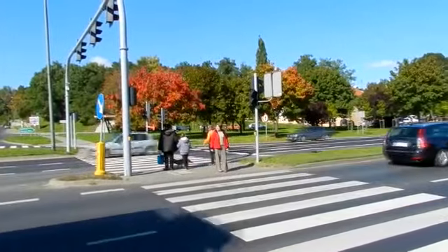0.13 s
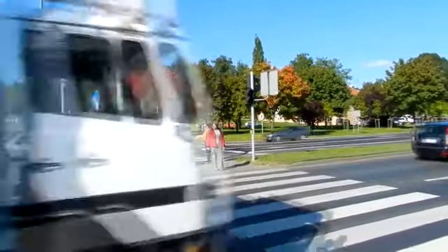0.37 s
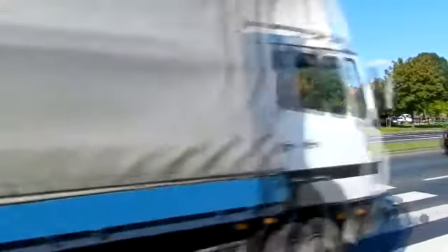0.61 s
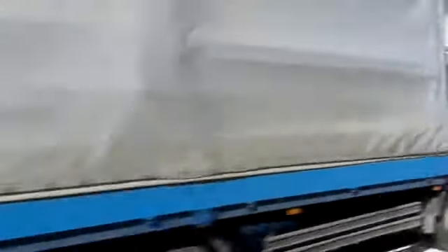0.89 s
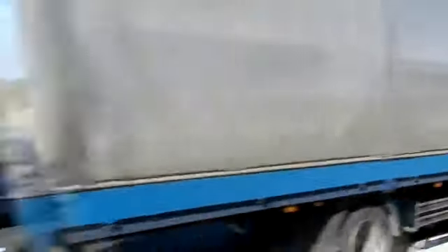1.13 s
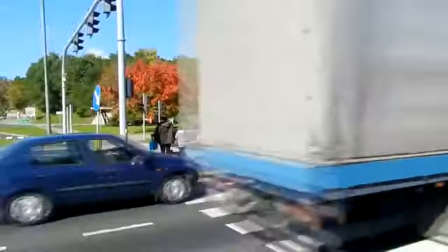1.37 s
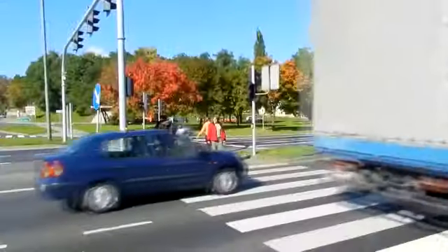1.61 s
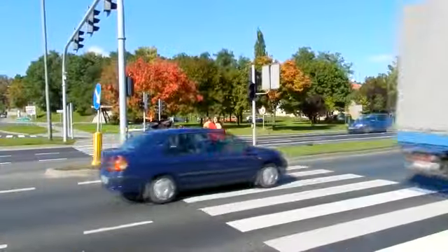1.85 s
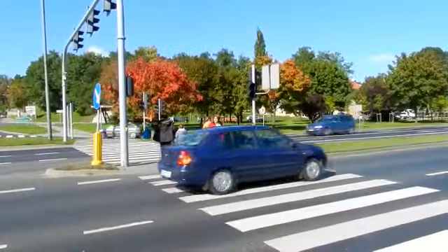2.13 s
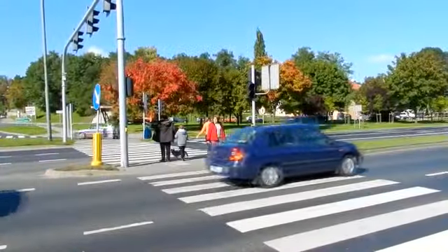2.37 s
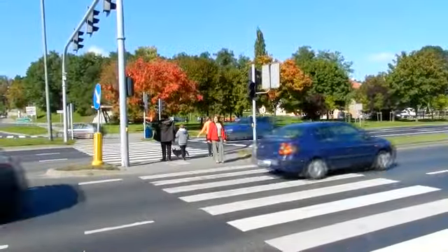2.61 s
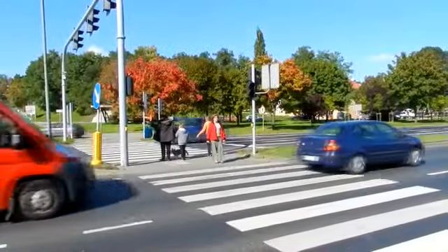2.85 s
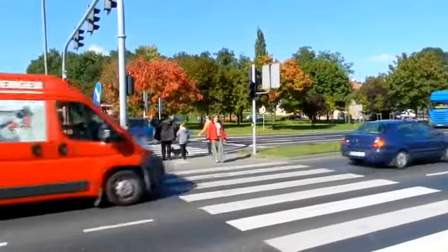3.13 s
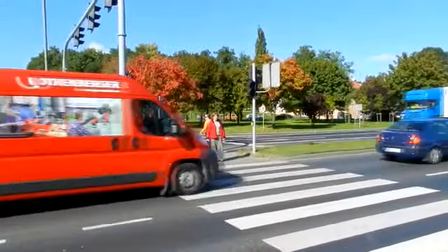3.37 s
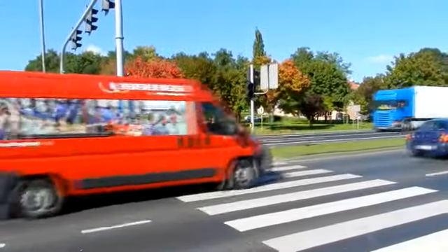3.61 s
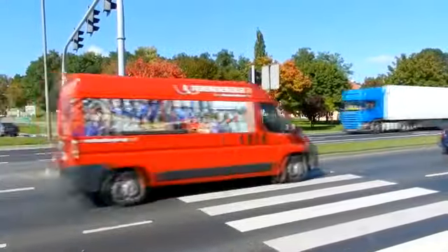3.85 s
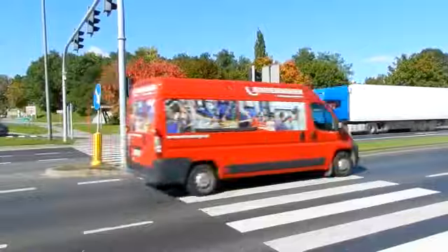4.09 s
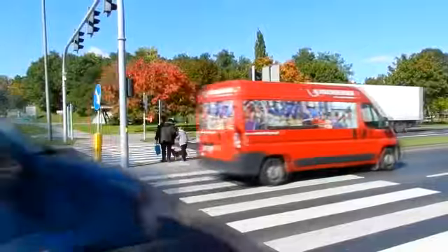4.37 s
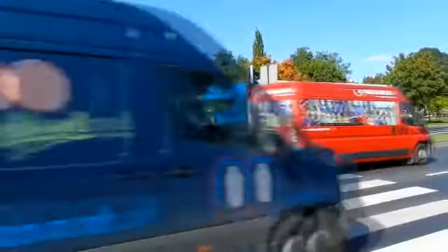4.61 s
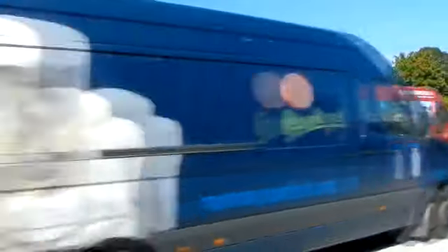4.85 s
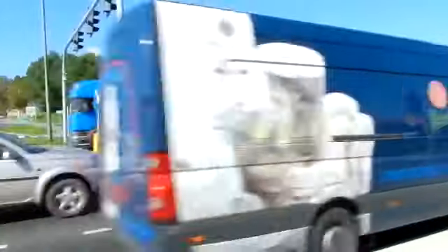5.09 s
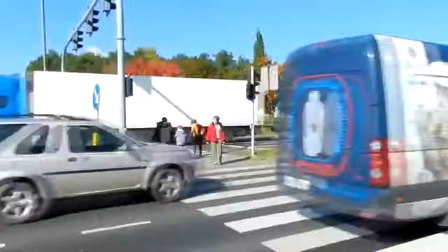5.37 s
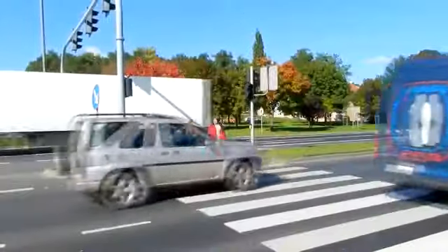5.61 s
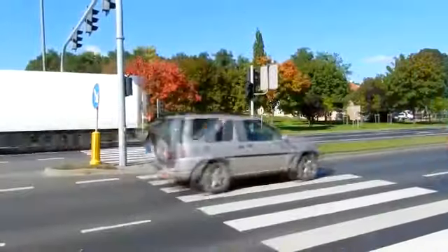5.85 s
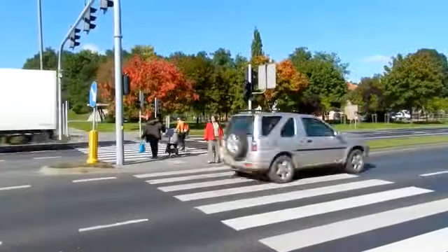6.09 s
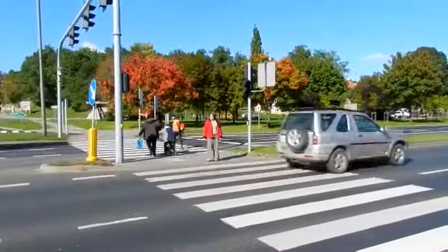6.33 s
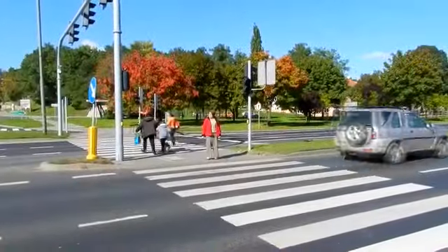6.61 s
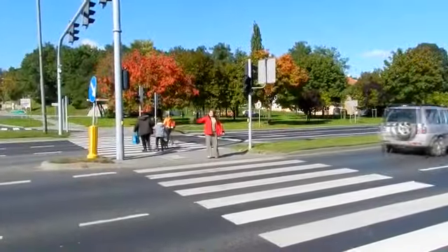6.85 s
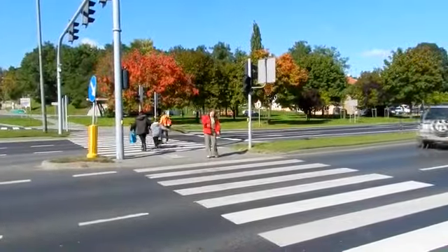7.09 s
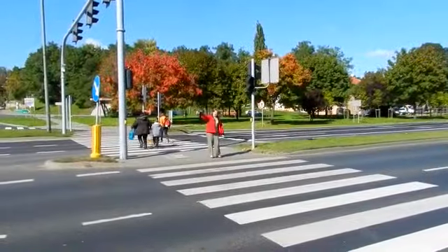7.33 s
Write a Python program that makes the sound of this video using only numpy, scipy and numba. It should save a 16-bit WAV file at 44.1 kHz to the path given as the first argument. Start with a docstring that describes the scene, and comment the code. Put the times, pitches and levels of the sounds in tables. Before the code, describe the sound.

Outdoor kerbside traffic in stereo, close and dry, with faint distant road rumble. From 0 s a diesel truck drones, its buzzing firing tone near 85 Hz; tyre roar, brighter hiss and a brief tread hum peak around 0.4-0.5 s, with a small squeaky hiss near 0.8 s. The truck moves away, its growl rising smoothly to about 107 Hz by 3.4 s, then falling quickly and gone by 4.1 s. A car's tyres swell at 2.75 s; one tiny sharp pebble tick at 2.9 s. Vans rush past from 3.5 to 5 s, loudest near 4 s, with low wavering hums and a very faint, breathy turbo whistle rising. Another car hums upward around 5.5 s. From about 4 s wind gusts thud and flutter heavily at the microphone, roughest at 5.2-6 s, continuing irregularly. A last low engine hum and tyre roar approach from 6.7 s to the end at 7.5 s.

```python
"""Street traffic in rising wind

A six-cylinder truck pulls past and away, then vans and cars follow, heard from the kerb in stereo.
Engines are sums of gliding tones; tyre roar, engine-bay hiss and turbocharger whistle are filtered noise.
A pebble ticks once, gusts flutter at two microphone ports, and the level of everything dips briefly."""
import sys
import numpy as np
from scipy import signal
from scipy.io import wavfile
from scipy.ndimage import uniform_filter1d
from numba import njit

SR = 44100
rng = np.random.default_rng(int(sys.argv[2]) if len(sys.argv) > 2 else 0)


def voltage_ratio(level):
    """Linear amplitude factor for a level in decibels (scalar or array-like)."""
    return 10 ** (np.asarray(level, float) / 20)


def store_wav(level_fs):
    """Save 16-bit WAV to argv[1]."""
    pcm = np.round(np.clip(np.atleast_2d(level_fs), -1, 1) * 32767)
    wavfile.write(sys.argv[1], SR, pcm.T.astype(np.int16))


N = 329427
LEFT_RIGHT = np.array([[1], [-1]])


def rms_one(x):
    """Scales to rms 1."""
    return x / np.sqrt(np.mean(x ** 2, axis=-1, keepdims=True) + 1e-20)


def in_time(rows):
    """Interpolates each column over time; the first column is seconds."""
    s, *columns = np.transpose(rows)
    return [np.interp(np.arange(N) / SR, s, c) for c in columns]


def at_hz(points, hz):
    """Interpolates a curve of (Hz, value) over log frequency."""
    curve_hz, values = np.transpose(points)
    return np.interp(np.log(hz), np.log(curve_hz), values)


def drift(rate_hz):
    """Slow chance of spread 1: noise at every 40th sample through a double one-pole low-pass."""
    r = np.exp(-80 * np.pi * rate_hz / SR)
    noise = rng.standard_normal(N // 40 + 2002)
    slow = signal.lfilter([1], [1, -2 * r, r * r], noise)[2000:]
    return np.interp(np.arange(N) / 40, np.arange(len(slow)), rms_one(slow))


@njit
def resonate(x, r, c):
    """Two-pole resonance with a moving centre, scaled so that white noise keeps its power."""
    y = np.zeros(len(x))
    for i in range(2, len(x)):
        drive = np.sqrt((1 - r[i] ** 2) / 2) * (x[i] - x[i - 2])
        y[i] = drive + 2 * r[i] * c[i] * y[i - 1] - r[i] ** 2 * y[i - 2]
    return y


def noise_band(hz, width_hz):
    """Noise twice through a moving resonance; level held near rms 1."""
    r = np.exp(-np.pi * width_hz / SR) * np.ones(N)
    c = np.cos(2 * np.pi * hz / SR) * np.ones(N)
    once = resonate(rng.standard_normal(N), r, c)
    return resonate(once, r, c) / np.sqrt((1 + r) / (1 - r) / 4)


def stereo(mid, side, alike):
    """Mixes two independent signals into channels with correlation alike."""
    return np.sqrt(1 + alike) * mid + np.sqrt(1 - alike) * side * LEFT_RIGHT


def spread(hz, width_hz, alike):
    """A stereo noise band, shared by both channels as far as alike says."""
    return stereo(noise_band(hz, width_hz), noise_band(hz, width_hz), alike) / np.sqrt(2)


def tone(turns, phase):
    """Sine of rms 1; turns and phase in cycles."""
    return np.sqrt(2) * np.sin(2 * np.pi * (turns + phase))


def swells(rows, floor_db, steep):
    """Rows (s, dB, time scale s, ..) swell like passing sources; powers add and weight the other columns."""
    s, db, scale_s, *columns = np.transpose(rows)[..., None]
    t = np.arange(0, N + 100, 100) / SR
    power = voltage_ratio(2 * db) / (1 + ((t - s) / np.maximum(scale_s, .01)) ** 2) ** steep
    total = power.sum(axis=0)
    coarse = [10 * np.log10(total)] + [(power * c).sum(axis=0) / total for c in columns]
    level_db, *others = [np.interp(np.arange(N) / SR, t, c) for c in coarse]
    return [10 * np.log10(voltage_ratio(2 * level_db) + voltage_ratio(2 * floor_db))] + others


def truck():
    """Firing tones as clean lines; unequal cylinders fill in every sixth of the firing rate."""
    # engine: (time [s], firing rate [Hz], relative level [dB], centre of the growl's lifted region [Hz])
    engine_rows = [(0, 84.9, 0.5, 450), (.35, 86.74, -1, 346), (.7, 88.95, -1, 440), (1.0, 90, -0.3, 620),
                   (1.3, 91.84, 0, 254), (1.8, 95.8, 1.1, 321.2), (2.3, 99.47, -1, 462.5),
                   (2.8, 103.2, -3.5, 336), (3.1, 106.1, -2.5, 295.7), (3.4, 107.3, -1.5, 252.7),
                   (3.55, 106.2, -4.5, 251.5), (3.93, 91.5, -2.5, 250), (4.1, 86.9, -18, 251.3)]
    # growl colour, one line per half turn order: (frequency [Hz], relative level [dB])
    growl_curve = [(20, -13), (55, -5), (150, -2), (250, -1.5), (400, -12), (800, -15.5), (1300, -20)]
    hz, engine_db, centre_hz = in_time(engine_rows)
    growl_db = engine_db - 30.0
    firing_db = firing_levels(hz, engine_db)
    firings = np.cumsum(hz * (1 + 0.00096 * drift(5.4))) / SR
    lines = np.zeros(N)
    for k in range(2, 72):      # half turn orders
        if k in (6, 12, 18, 24):
            level_db = firing_db[k // 6 - 1] + 0.92 * drift(9.2)
            phase = -.17        # the firing tones rise together, one steep pulse per firing
        else:
            line_hz = hz * k / 6
            octaves_off = np.log2(line_hz / centre_hz)
            lift_db = 6.5 * np.exp(-(octaves_off / 0.42) ** 2)
            level_db = growl_db + at_hz(growl_curve, line_hz) + lift_db + 3.7 * drift(1.5)
            if k % 2:
                level_db = level_db - 12.5      # half orders are weaker than whole turns
            if k % 6 == 0:
                level_db = level_db + 5.0       # higher multiples of the firing rate
            phase = rng.random()
        lines += voltage_ratio(level_db) * tone(firings * k / 6, phase)
    fade = np.clip((engine_rows[-1][0] - np.arange(N) / SR) / 0.093, 0, 1)
    echo = np.roll(lines, round(0.0031 * SR))      # a near reflection reaches the two ports unequally
    return fade * (lines + voltage_ratio(-31.5) * echo * LEFT_RIGHT + diesel_knock(firings, growl_db - 11.0))


def firing_levels(hz, engine_db):
    """Levels of four firing tones; the lowest grows as it climbs toward the exhaust pipe's resonance."""
    # firing tone and its 2nd, 3rd and 4th multiples: relative level [dB]
    tone_db = [-17, -14, -22.5, -33]
    # fades and swells, one list per tone: (time [s], change [dB], time scale [s])
    tone_changes = [
        [(0.47, -10, 0.12)],
        [(.7, 2.5, 0.15), (1.08, -4, 0.19), (2.48, 5, 0.066), (2.6, 5, 0.057), (3.21, -13.5, 0.081),
         (3.85, -15, 0.28)],
        [(.2, -29, 0.55), (1.35, 4, 0.085), (1.72, 4, 0.23), (2.57, -8, 0.091), (3.7, -12, 0.44)],
        [(.54, 16, 0.19), (2.0, 4.5, .6), (2.65, 2, .08), (3.6, -9, .5)],
    ]
    pipe_db_per_hz, pipe_from_hz = 0.5, 89.4
    t = np.arange(N) / SR
    levels = []
    for db, changes in zip(tone_db, tone_changes):
        change_db = sum(change * np.exp(-((t - s) / scale_s) ** 2) for s, change, scale_s in changes)
        levels.append(engine_db + db + change_db)
    levels[0] = levels[0] + pipe_db_per_hz * (hz - pipe_from_hz)
    return levels


def diesel_knock(firings, level_db):
    """Each combustion gates a short burst of block noise."""
    burst = rms_one(np.exp(-4.0 * (firings % 1)))
    block = spread(1400.0, 1070.0, 0.7) + voltage_ratio(-10.5) * spread(4700.0, 2400.0, 0.59)
    return voltage_ratio(level_db) * burst * block


def cars():
    """Van and car engines hum wavering, gliding notes, each with a weaker octave."""
    # notes: (start [s], end [s], start frequency [Hz], end frequency [Hz], mean level [dB rms])
    notes = [(3.6, 4.2, 143, 167, -26.5), (4.12, 5.15, 145, 98.5, -24), (4.004, 5.348, 54.4, 60.6, -24),
             (4, 5.303, 73, 68, -23.5), (5.247, 5.853, 113.9, 140.9, -21), (6.699, 7.297, 66, 73.8, -20.5)]
    fade_s, octave_db = 0.069, -15.0
    out, t = np.zeros(N), np.arange(N) / SR
    for start, end, start_hz, end_hz, level_db in notes:
        hz = np.interp(t, [start, end], [start_hz, end_hz])
        turns = np.cumsum(hz * (1 + 0.01105 * drift(5.0))) / SR
        heard = np.clip(np.minimum(t - start, end - t) / fade_s + .5, 0, 1)
        note = tone(turns, 0) + voltage_ratio(octave_db) * tone(2 * turns, rng.random())
        out += heard * voltage_ratio(level_db + 1.5 * drift(7.0)) * note
    return out


def road():
    """Tyre noise in narrow bands; roar, hiss and top hiss add up in power in each band."""
    # swells of tyre noise, a vehicle may give several:
    # (peak [s], roar [dB], time scale [s], hiss re roar [dB], top hiss re hiss [dB])
    tyre_swells = [(-0.05, -21, 0.35, -15.5, -8.5), (.48, -20.5, 0.27, -10.5, -4),
                   (1.15, -24, 0.51, -13.5, -12.5), (2.75, -20.5, 0.28, -18, -13),
                   (3.5, -18.5, 0.37, -20, -5), (3.97, -14.5, 0.23, -19, -7.5),
                   (4.6, -16.5, 0.22, -21, -9.5), (5.0, -19, 0.25, -23, -8), (5.55, -26, 0.26, -23.5, -3),
                   (6.9, -20, 0.34, -22, -9), (7.5, -18.5, 0.18, -21.5, -13)]
    # spectral shapes, normalised below: (frequency [Hz], relative density [dB per Hz])
    roar_curve = [(40, -34), (70, 3), (120, 4.5), (250, 6.5), (420, -4), (650, 1.5), (1000, -3.5),
                  (1700, -9), (2600, -23), (4000, -44)]
    hiss_curve = [(1500, -32), (2600, 1), (4500, 1.5), (6500, -3), (8500, -27), (12000, -35)]
    top_curve = [(5000, -7.5), (7500, 3), (10000, 1), (13000, -7), (16000, -5)]
    # left-right likeness: (frequency [Hz], correlation [-1..1])
    likeness = [(60, 0.93), (150, 1), (380, 1), (950, 0.93), (2380, 0.58), (5980, 0.14), (15000, -0.22)]
    # pan: (time [s], left minus right [dB])
    pan_rows = [(0, 4), (.6, 1), (1.5, -4), (2.2, -2.5), (3.0, 0), (3.8, 1.5), (5.0, -0.5), (7.47, -1.5)]
    far_traffic_db = -30.0
    levels_db = np.cumsum(swells(tyre_swells, far_traffic_db, steep=1.0), axis=0)
    pan_db, = in_time(pan_rows)
    edges = 35 * 2 ** np.arange(0, 9, 1 / 2.5)
    centres, widths = np.sqrt(edges[1:] * edges[:-1]), np.diff(edges)
    shares = [voltage_ratio(at_hz(curve, centres)) ** 2 for curve in (roar_curve, hiss_curve, top_curve)]
    shares = [s / np.sum(s * widths) * SR / 2 for s in shares]
    white = rng.standard_normal((2, 2, N))      # neighbouring bands take different noise
    together, out = drift(11.7), np.zeros((2, N))
    for k, hz in enumerate(centres):
        band = signal.butter(2, edges[k:k + 2], "band", fs=SR, output="sos")
        mid, side = signal.sosfilt(band, white[k % 2])
        power = sum(s[k] * voltage_ratio(2 * db) for s, db in zip(shares, levels_db))
        patchy_db = 0.81 * together + drift(8.8)
        out += np.sqrt(power / 2) * voltage_ratio(patchy_db) * stereo(mid, side, at_hz(likeness, hz))
    return (out + tyre_tread()) * voltage_ratio(pan_db / 2 * LEFT_RIGHT)


def tyre_tread():
    """Tyre tread noise: one narrow hump that swells, fades and glides in pitch as vehicles pass."""
    # swells of the hump: (time [s], level [dB rms], time scale [s], centre [Hz])
    tread_swells = [(.36, -18.5, 0.07, 945), (.45, -16.5, 0.052, 795), (.65, -25, 0.15, 870),
                    (.95, -24, 0.17, 626), (1.6, -30.5, 0.44, 815), (2.8, -32, 0.95, 800),
                    (4.05, -24, 0.12, 697), (4.65, -25.5, 0.44, 890), (5.8, -27.5, 1, 584),
                    (7.1, -29, 0.47, 532)]
    level_db, hz = swells(tread_swells, -60.0, steep=1.9)
    return voltage_ratio(level_db + 0.7 * drift(2.9)) * spread(hz, 237.0, 1.0)


def wind():
    """Eddies flutter at each port: a low wandering band and a higher one above it, steady under each gust."""
    # wind: (time [s], relative steady level [dB], left minus right before the ports mix [dB])
    steady_rows = [(0, -37, -3), (1.8, -19, 3), (3.2, -20.5, 9), (4.5, -22, -5.5), (5.2, -19, 11),
                   (5.5, -14, -3), (6.3, -24, 4), (7.47, -18, 6)]
    # gusts: (time [s], relative peak level [dB], time scale [s], upper flutter re low [dB])
    gusts = [(3.66, -14, .06, -25), (3.9, -11, 0.15, -26.5), (4.14, -4.5, 0.042, -23),
             (4.3, -5, 0.033, -18), (4.46, -9.5, 0.028, -16), (4.7, -14.5, 0.065, -12),
             (4.92, -16, 0.066, -20), (5.2, -6, 0.046, -24), (5.32, -6, .045, 0.5), (5.47, -4.5, 0.12, -5),
             (5.74, -8, 0.07, -3.5), (5.99, -6, 0.075, -8.5), (6.14, -11, 0.11, -9), (6.37, -6, 0.057, -26),
             (6.7, -8.5, 0.094, -25), (6.94, -9.5, .05, -20), (7.1, -3.5, 0.037, -20),
             (7.33, -7, 0.099, -24)]
    steady_db, side_db = in_time(steady_rows)
    gust_db, upper_db = swells(gusts, steady_db, steep=1.55)
    ports = []
    for port_db in (gust_db + side_db / 2, gust_db - side_db / 2):
        low_hz = np.clip(84.6 * 2 ** (0.39 * drift(9.4)), 30, 300)
        high_hz = np.clip(204.0 * 2 ** (0.35 * drift(25)), 60, 900)
        low = noise_band(low_hz, low_hz * 0.97)
        high = noise_band(high_hz, high_hz * 0.7)
        flutter = low + voltage_ratio(upper_db + 2.1 * drift(24)) * high
        power = uniform_filter1d(uniform_filter1d(flutter ** 2, size=1500), size=1500) + 1e-3
        evened = flutter / power ** (0.17 / 2)      # takes out a little of the chance swelling
        ports.append(evened * voltage_ratio(port_db - 4.0 + 3.5 * drift(11.7)))
    left, right = ports
    cross = -.55 / 2      # the ports are partly subtracted from each other
    return np.array([left + cross * right, right + cross * left])


def engine_bay():
    """Belts and valves squeak in three neighbouring bands that flicker on their own."""
    # squeaky hiss of the nearest vehicle: (time [s], relative level [dB], time scale [s], centre [Hz])
    squeaks = [(.05, -42, 0.13, 3850), (.8, -36, 0.089, 3810), (1.15, -44, 0.067, 2960),
               (3.72, -37, 0.1, 4620), (4.02, -34.5, 0.15, 4540), (4.7, -45.5, 0.47, 4430),
               (6.9, -54, .3, 6900)]
    level_db, hz = swells(squeaks, -75.0, steep=1.95)
    thin = sum(voltage_ratio(3.5 * drift(22)) * spread(hz * ratio, 200, .5) for ratio in (.95, 1, 1.045))
    return voltage_ratio(level_db - 5.5) * thin


def turbo():
    """A turbocharger's breathy whistle, a narrow noise band rising with boost."""
    # whistle: (time [s], centre [Hz], mean level [dB rms])
    whistle = [(3.4, 12500, -68), (3.55, 13080, -50), (3.9, 14580, -48), (4.3, 15530, -54),
               (4.7, 15750, -70)]
    hz, level_db = in_time(whistle)
    return voltage_ratio(level_db + 1.5 * drift(15)) * spread(hz, 300, .3)


def pebble():
    """One tick into very short decaying modes."""
    # ticks: (time [s], level [dB])
    ticks = [(2.917, -20)]
    # modes: (frequency [Hz], level re tick [dB], 60 dB decay time [s])
    modes = [(8400, 0.5, 0.0033), (10800, -11, .002), (12800, -4, .003)]
    out = np.zeros(N)
    for s, tick_db in ticks:
        t = np.maximum(np.arange(N) / SR - s, 0)
        for hz, db, t60_s in modes:
            out += voltage_ratio(tick_db + db - 60 * t / t60_s) * np.sin(2 * np.pi * hz * t)
    return out


def dips():
    """Gain of the whole sound: each dip falls within a few ms and climbs back at a steady rate."""
    # dips: (time [s], depth [dB])
    drops = [(1.467, 3), (1.876, 3.5), (2.549, 3), (2.998, 2.5), (3.3, 5.5), (3.798, 4.5), (4.066, 3.5),
             (4.652, 3.5), (4.989, 2), (5.166, 5), (5.512, 2.5), (5.991, 2), (6.331, 3.5), (6.909, 3),
             (7.121, 4)]
    climb_db_per_s = 9.5
    t, db = np.arange(N) / SR, np.zeros(N)
    for s, depth_db in drops:
        db -= (t >= s) * np.maximum(depth_db - climb_db_per_s * (t - s), 0)
    return voltage_ratio(uniform_filter1d(db, size=220))


def scene():
    """All sources under the common dips."""
    return (truck() + cars() + road() + wind() + engine_bay() + turbo() + pebble()) * dips()


def top_cut(x):
    """Nothing passes above the cut-off."""
    return signal.sosfilt(signal.butter(12, 15700, fs=SR, output="sos"), x)


def record(dry):
    """The bass is cut and the loudest gusts hit the top of the range."""
    bass_cut = signal.butter(2, 45.0, "high", fs=SR, output="sos")
    x = signal.sosfilt(bass_cut, dry)
    limited = x / (1 + np.abs(x) ** 12) ** (1 / 12)
    return top_cut(limited)


dry = scene()
out = record(dry)
store_wav(out)
```